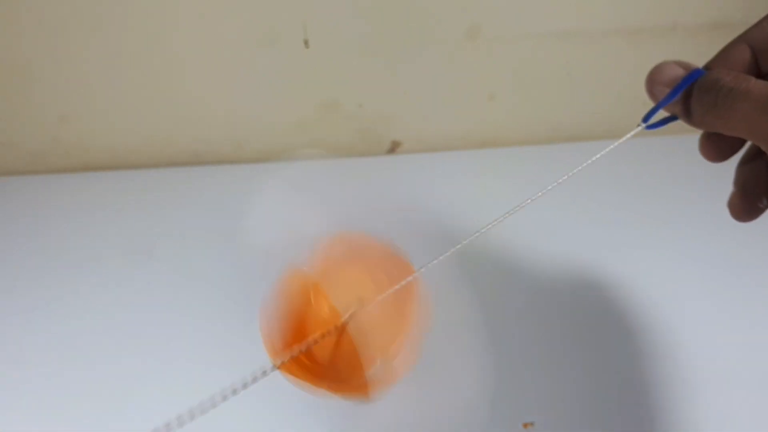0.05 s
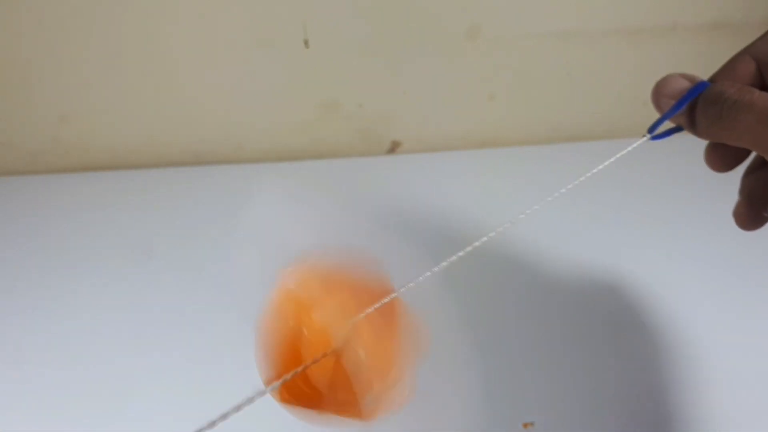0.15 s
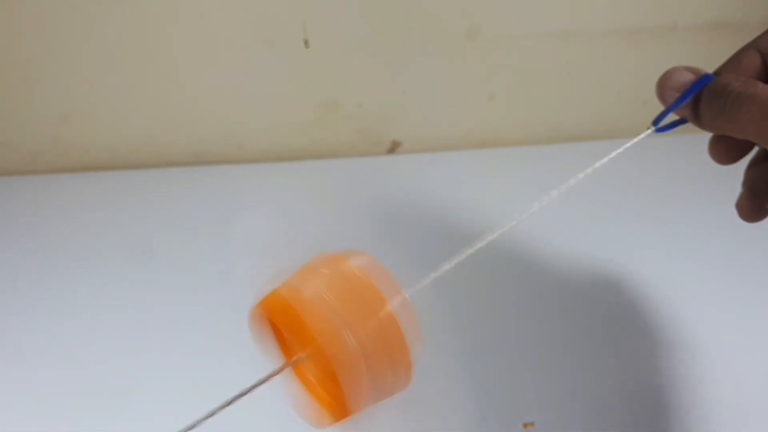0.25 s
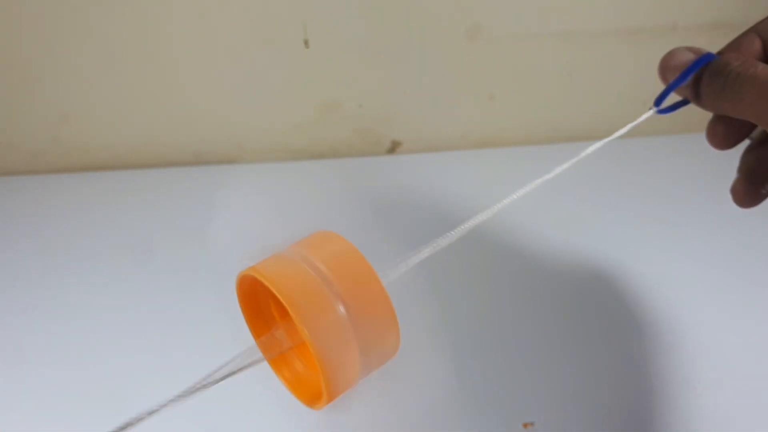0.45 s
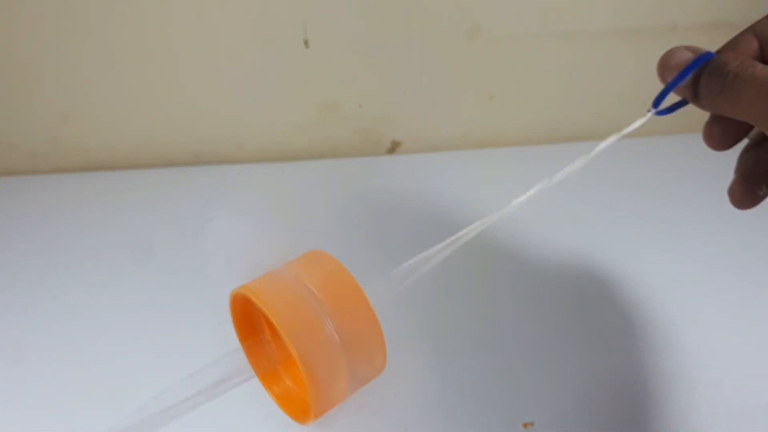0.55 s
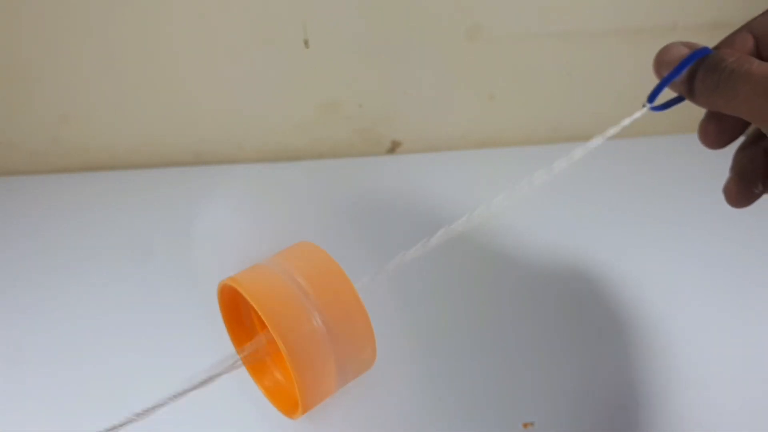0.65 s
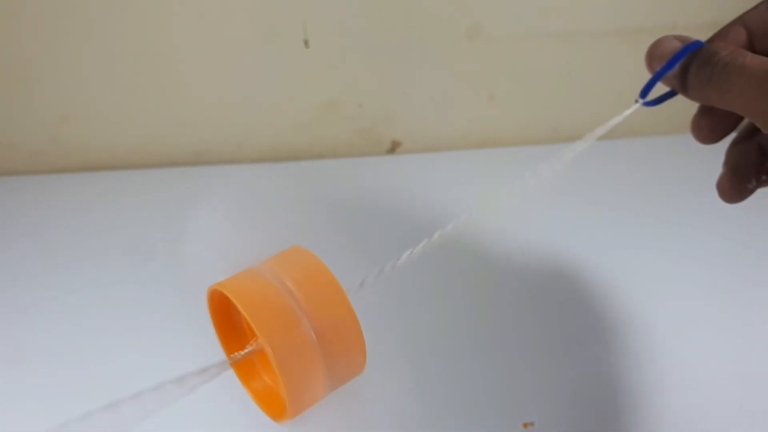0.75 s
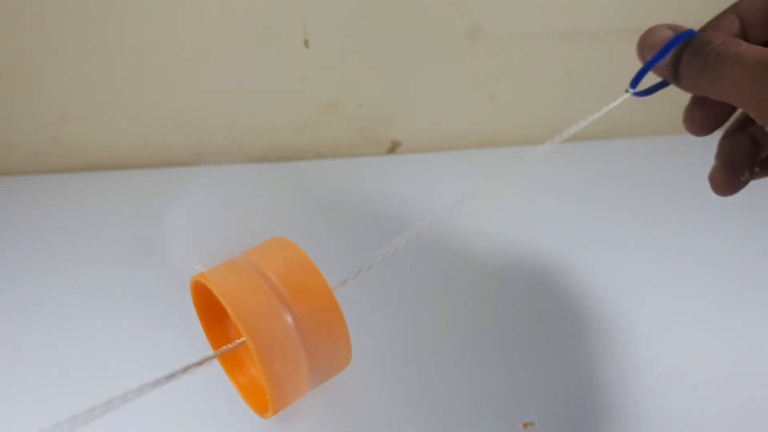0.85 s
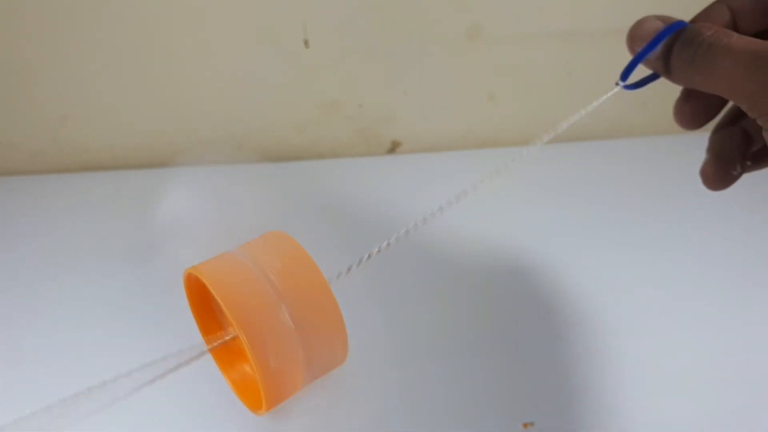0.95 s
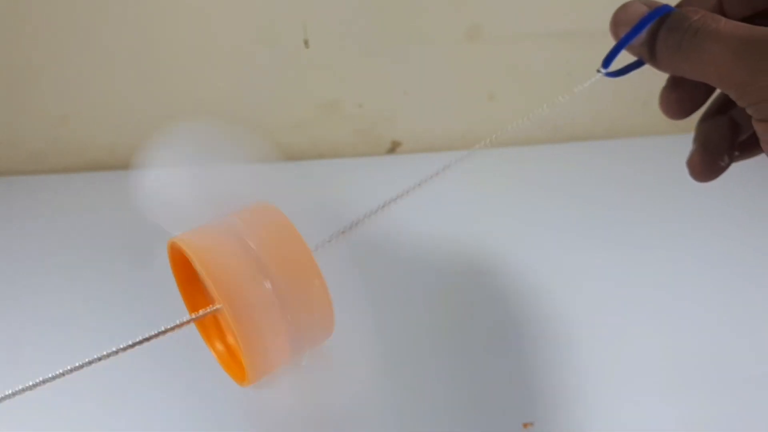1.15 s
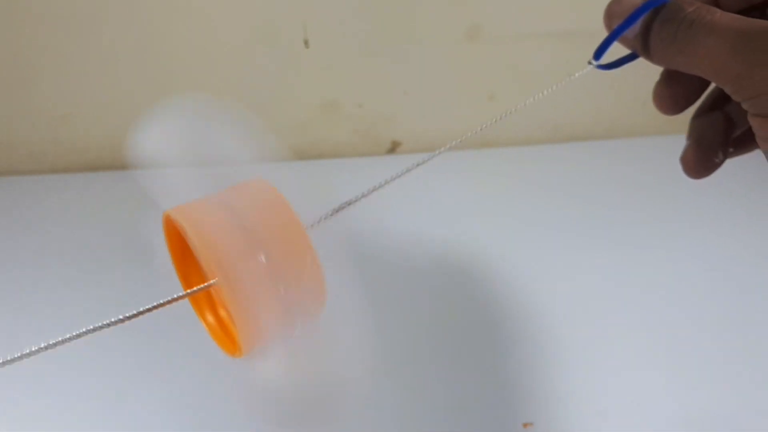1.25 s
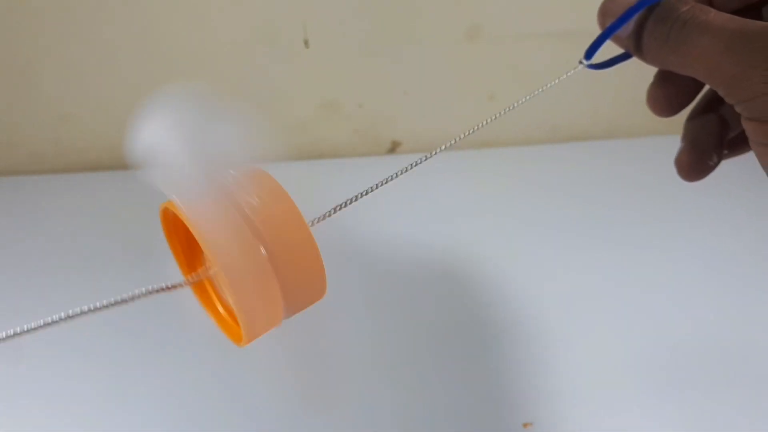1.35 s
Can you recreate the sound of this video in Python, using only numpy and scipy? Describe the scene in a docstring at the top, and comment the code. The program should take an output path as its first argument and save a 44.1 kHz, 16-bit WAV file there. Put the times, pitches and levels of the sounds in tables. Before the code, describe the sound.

A plastic cap whirls on a twisted string with a buzzing whistle, then winds down.

```python
"""Bottle cap whirling on a string

One pull spins up a plastic cap on a twisted string near the microphone; then it coasts down. Its wobble
pushes the air once a turn, a low hum. Rushing air makes its hollow whistle in beating tones that overload
the recorder into a buzz. Air swishes round the rim and a draught rumbles on the microphone."""
import sys
import numpy as np
from scipy import signal
from scipy.io import wavfile
from scipy.ndimage import uniform_filter1d

SR = 44100
rng = np.random.default_rng(int(sys.argv[2]) if len(sys.argv) > 2 else 0)


def digitize_waveform(pressure):
    """Quantize a signal to 16-bit integers and store it at the path in sys.argv[1].

    Rows of a 2-D input are taken as channels; values are limited to [-1, 1].
    """
    field = np.atleast_2d(pressure).T
    bounded = np.clip(field, -1, 1)
    quanta = np.round(bounded * 32767).astype(np.int16)
    wavfile.write(sys.argv[1], SR, quanta)


N = 61739
TIME = np.arange(N) / SR


def from_db(db):
    """Amplitude grows tenfold for every 20 dB."""
    return 10 ** (np.asarray(db) / 20)


def unit_rms(x):
    """Division by the root mean square gives unit power."""
    return x / np.sqrt(np.mean(np.abs(x) ** 2) + 1e-20)


def in_time(rows):
    """Linear interpolation joins timed points into a curve."""
    return np.interp(TIME, *np.transpose(rows))


def phase(hz):
    """Phase is the time integral of frequency."""
    return 2 * np.pi * np.cumsum(hz) / SR


def pan(db):
    """A level difference gives direction: the left gains db, the right loses as much."""
    return from_db([[db], [-db]])


def from_left(x, delay_s=0.00015):
    """A longer path delays the sound on the right."""
    return np.array([x[0], np.interp(TIME - delay_s, TIME, x[1])])


def coloured_noise(colour, correlation):
    """Half-octave noise bands add up to a spectrum of unit power, partly correlated between sides."""
    hz, db = np.transpose(colour)
    edges = 15 * 2 ** np.arange(0, 10.1, .5)
    white = rng.standard_normal((2, 2, N + SR // 2))
    bands = 0
    for k, (low, high) in enumerate(zip(edges, edges[1:])):
        gain = from_db(np.interp(np.log(low * high) / 2, np.log(hz), db, right=-np.inf))
        bandpass = signal.butter(2, [low, high], "band", fs=SR, output="sos")
        bands = bands + gain * signal.sosfilt(bandpass, white[k % 2])[:, -N:]
    mid, side = bands
    return unit_rms(np.sqrt(1 + correlation) * mid + np.sqrt(1 - correlation) * side * [[1], [-1]])


# Spectrum of the still room. Each row: frequency in Hz, relative density in dB.
ROOM_SPECTRUM = [(25, -4), (100, -7), (300, -7.5), (800, -15), (3000, -24.5), (6000, -26.5), (15000, -32)]
# Steady tones of the room. Each row: frequency in Hz, level in dB.
ROOM_LINES = [(100, -49), (3300, -73.5), (4950, -81)]
def room():
    """Background noise: faint spectral lines stand on a continuous spectrum of rumble and hiss."""
    tones = sum(np.sqrt(2) * from_db(db) * np.sin(2 * np.pi * hz * TIME) for hz, db in ROOM_LINES)
    return from_db(-56) * coloured_noise(ROOM_SPECTRUM, correlation=0.09) + tones


# Envelope of the draught. Each row: time in seconds, relative level in dB.
DRAUGHT_LEVEL = [(0, -58.1), (0.2, -57.8), (0.38, -49.7), (0.48, -44.6), (0.65, -38.0), (0.82, -42.4),
                 (0.95, -53.8), (1.15, -55.9)]
# Spectrum of the draught. Each row: frequency in Hz, relative density in dB.
DRAUGHT_SPECTRUM = [(20, 1), (35, -17), (70, -8.5), (150, -1), (300, -21.5), (700, -36)]
def draught():
    """Wind noise: stirred air takes time to reach the microphone, so its rumble peaks after the spin."""
    level = from_db(in_time(DRAUGHT_LEVEL) + 1)
    return level * pan(3) * coloured_noise(DRAUGHT_SPECTRUM, correlation=0.16)


# Envelopes of the hum's first two harmonics. Each row: time in seconds, relative level in dB.
FUNDAMENTAL_LEVEL = [(0.0, -55), (0.054, -45.5), (0.116, -28.5), (0.198, -18.5), (0.31, -15),
                     (0.428, -14.5), (0.466, -15.5), (0.548, -16), (0.598, -18.5), (0.914, -22.5),
                     (1.168, -29), (1.4, -48)]
OCTAVE_LEVEL = [(0, -81), (.12, -44.5), (.24, -42.5), (.42, -44), (.52, -32), (.62, -53.5), (.9, -39.5),
                (1.17, -46.5), (1.4, -62.5)]
def hum(spin, left_lead_rad=0.89):
    """Periodic forcing: the off-centre cap pushes the air once a turn, and more weakly twice a turn."""
    angle = phase(spin) + np.array([[left_lead_rad], [0]])
    fundamental = from_db(in_time(FUNDAMENTAL_LEVEL) - 1) * np.sin(angle)
    octave = from_db(in_time(OCTAVE_LEVEL)) * np.sin(2 * angle)
    return np.sqrt(2) * pan(2.6) * (fundamental + octave)


# Envelope of the air at the rim. Each row: time in seconds, relative level in dB.
SWISH_LEVEL = [(0, -79), (0.07, -66), (0.17, -45.5), (0.29, -33), (0.42, -35), (0.6, -41.5), (0.9, -41),
               (1.03, -47.5), (1.15, -51), (1.28, -57.5), (1.4, -72)]
# Spectrum of that air. Each row: frequency in Hz, relative density in dB.
SWISH_SPECTRUM = [(130, 1), (250, 1), (400, -11.5), (650, -13), (1000, -4.5), (1400, 3), (1800, 5),
                  (2300, -2), (2700, -13), (3200, -9), (4500, -13)]
def swish(spin, top_hz=3240):
    """Turbulence: air tears round the rim, throbbing once a turn and surging at each jerk."""
    throb = 1 + 0.22 * np.sin(phase(spin))
    level = from_db(in_time(SWISH_LEVEL) + 9.5) + from_db(-14) * jerks()
    lowpass = signal.butter(4, top_hz, fs=SR, output="sos")
    air = signal.sosfilt(lowpass, coloured_noise(SWISH_SPECTRUM, correlation=.55))
    return level * throb * from_left(air)


def hollow_noise(resonance_hz=1765, width_hz=195, top_hz=2000):
    """Cavity resonance: turbulence rings the air in the hollow of the cap."""
    b, a = signal.iirpeak(resonance_hz, resonance_hz / width_hz, fs=SR)
    air = from_left(rng.standard_normal(N) + 0.98 * rng.standard_normal((2, N)))
    air = signal.sosfilt(signal.butter(8, top_hz, fs=SR, output="sos"), air)
    return unit_rms(signal.lfilter(b, a, signal.lfilter(b, a, air)))


# Jerks of the unwinding string. Each row: start in seconds, peak level in dB.
STRING_JERKS = [(0.075, -36), (0.117, -32.5), (0.155, -26.5), (.197, -18), (0.225, -28), (0.249, -43),
                (1.172, -40.5)]
def jerks(attack_s=0.0021, decay_s=0.0063):
    """Impulsive excitation: the envelope of each jerk rises fast and decays exponentially."""
    envelope = 0
    for start, db in STRING_JERKS:
        age = np.maximum(TIME - start, 0)
        rise = np.minimum(age / attack_s, 1)
        decay = np.exp(-np.maximum(age - attack_s, 0) / decay_s)
        envelope = envelope + from_db(db) * rise * decay
    return envelope


# Envelope of the whistle. Each row: time in seconds, level in dB.
WHISTLE_LEVEL = [(0, -65), (0.04, -66), (0.075, -52), (0.12, -43), (0.16, -26.5), (0.21, -30.5),
                 (0.26, -11.5), (0.29, -6.5), (0.36, -7), (0.47, -5), (0.62, -2), (0.75, -2), (0.85, -6),
                 (0.94, -10.5), (1.06, -14.5), (1.1, -19), (1.28, -29), (1.4, -37.5)]
# Dips in the whistle. Each row: centre in seconds, half length in seconds, level change in dB.
WHISTLE_DIPS = [(0.323, 0.0077, -2), (.42, 0.026, -2.5), (.539, 0.0085, -4.5), (0.91, 0.0087, -2)]
def whistle_db():
    """Gains add in decibels: brief dips dent the whistle's swell and fall."""
    dips = sum(db * np.exp(-((TIME - centre) / half) ** 2) for centre, half, db in WHISTLE_DIPS)
    return in_time(WHISTLE_LEVEL) + dips


MID_SPIN = 105  # turns per second
# Whistle tones. Each row: pitch at MID_SPIN in Hz, rise in Hz per turn per second, relative level in dB.
CAVITY_TONES = [(1741, 2.8, -9), (1775.5, 2.7, -4.5), (1852.5, 3.6, -8.5), (1886, 4.2, -6.5),
                (1950, 4.8, -9)]
# Phase lead of the left side. Each row: frequency in Hz, lead in radians.
LEFT_LEAD = [(1650, 0.73), (1830, 1.494), (2020, 2.17)]
def beating_tones(spin, flutter_hz=12, flutter_depth=.45, steady_s=.07):
    """Beats: close, fluttering tones rise with the spin and interfere; their mean power is held steady."""
    tones = 0
    for mid_hz, rise, db in CAVITY_TONES:
        hz = mid_hz + rise * (spin - MID_SPIN)
        angle = phase(hz) + 2 * np.pi * rng.random()
        angles = np.array([angle + np.interp(hz, *np.transpose(LEFT_LEAD)), angle])
        flutter = np.array([drift(flutter_hz) + 1j * drift(flutter_hz) for side in range(2)])
        phasor = (1 + flutter_depth * flutter / np.sqrt(2)) * np.exp(1j * angles)
        tones = tones + from_db(db) * phasor.real
    power = uniform_filter1d(tones ** 2, int(steady_s * SR), axis=-1)
    return tones / np.sqrt(power)


def drift(corner_hz, step=40):
    """Low-pass filtering turns white noise into a slow wander of unit spread."""
    pole = np.exp(-2 * np.pi * corner_hz * step / SR)
    white = rng.standard_normal(N // step + 2002)
    slow = signal.lfilter([1], [1, -2 * pole, pole * pole], white)[2000:]
    return np.interp(np.arange(N) / step, np.arange(len(slow)), unit_rms(slow))


def whistle(spin, lock_spin=83.8, lock_width=3.4, lock_start_s=0.3, lock_rise_s=0.051):
    """Lock-in: breathy ringing turns into throbbing tones once the cap runs fast and true."""
    fast = (1 + np.tanh((spin - lock_spin) / lock_width)) / 2
    settled = (1 + np.tanh((TIME - lock_start_s) / lock_rise_s)) / 2
    locked = fast * settled
    level = from_db(whistle_db())
    throb = 1 + .22 * np.sin(phase(spin))
    tones = level * np.sqrt(locked) * throb * beating_tones(spin)
    breath_level = level * from_db(-2 - 9.5 * locked)
    breath = (breath_level + jerks()) * hollow_noise()
    return pan(-0.14) * with_squeals(tones + breath, spin)


# Spectrum of the fine hiss. Each row: frequency in Hz, relative density in dB.
HISS_SPECTRUM = [(100, -30), (1500, -12.5), (2800, 2.5), (4500, -1), (6500, -7.5), (10000, -10),
                 (15000, -23.5)]
def hiss(exponent=2.27):
    """Power law: a fine treble hiss swells steeply with the loud whistle."""
    level = from_db(-27.5 + exponent * whistle_db())
    return level * from_left(coloured_noise(HISS_SPECTRUM, correlation=.2))


# Brief squeals. Each row: centre in seconds, half length in seconds, peak level in dB.
SQUEAL_EVENTS = [(.299, 0.0017, 2), (0.336, 0.0047, 0.4), (0.369, 0.0035, 0.7), (0.385, 0.0022, 0),
                 (.472, 0.0073, 1.5), (0.826, 0.01, 1), (0.85, 0.0068, 1.5), (0.877, 0.0086, 1.03),
                 (0.888, 0.0028, 1), (.928, 0.0061, 0.44)]
def with_squeals(beating, spin, mid_hz=1851, rise=5.9):
    """Beats need several tones: they cease briefly while one strong, pure tone takes over."""
    tone = np.sin(phase(mid_hz + rise * (spin - MID_SPIN)))
    tone = from_left([tone, tone])
    for centre, half_length, db in SQUEAL_EVENTS:
        share = np.exp(-((TIME - centre) / half_length) ** 4)
        beating = (1 - share) * beating + share * from_db(db) * tone
    return beating


# Rotation of the cap. Each row: time in seconds, speed in turns per second.
SPIN_RATE = [(0.0, 48.2), (0.038, 58.4), (0.116, 79.6), (0.178, 98.2), (0.272, 115.1), (0.404, 121.6),
             (0.552, 115.2), (0.828, 97.9), (1.07, 82.8), (1.176, 73.9), (1.268, 66.0), (1.4, 51.5)]
def scene():
    """Superposition: all sources add, with one rotation driving hum, whistle and swish."""
    spin = in_time(SPIN_RATE)
    return hum(spin) + whistle(spin) + swish(spin) + hiss() + draught() + room()


def record(dry, hardness=16, noise_db=-26, cutoff_hz=15700):
    """Saturation flattens crests into a buzz. Faint noise is added at overloaded peaks; the top is cut."""
    flattened = dry / (1 + np.abs(dry) ** hardness) ** (1 / hardness)
    peak_noise = from_db(noise_db) * (np.abs(dry) > 1) * rng.standard_normal(dry.shape)
    lowpass = signal.ellip(10, .1, 70, cutoff_hz, fs=SR, output="sos")
    return signal.sosfilt(lowpass, flattened + peak_noise)


dry = scene()
out = record(dry)
digitize_waveform(out)
```